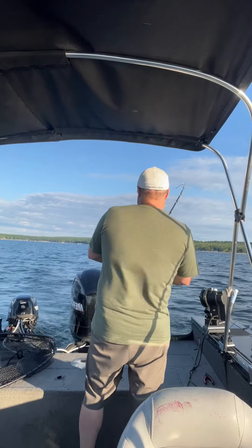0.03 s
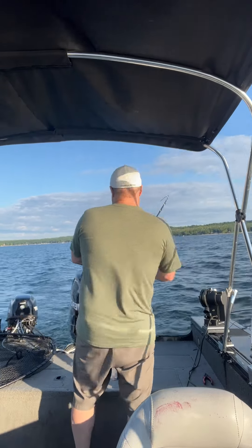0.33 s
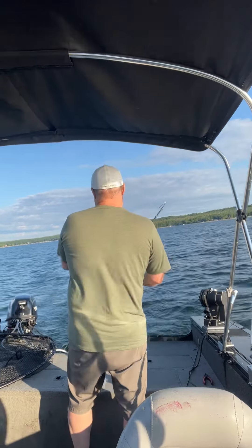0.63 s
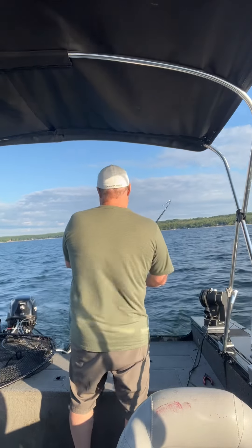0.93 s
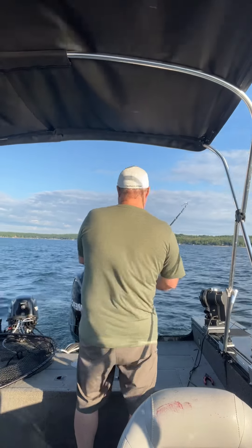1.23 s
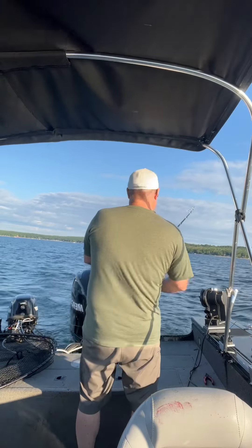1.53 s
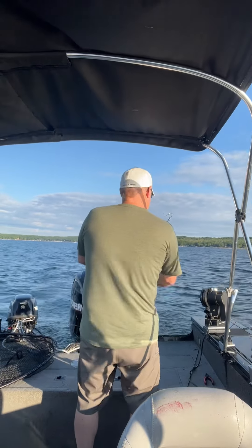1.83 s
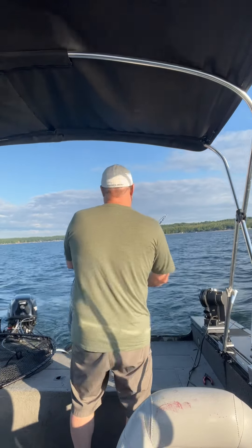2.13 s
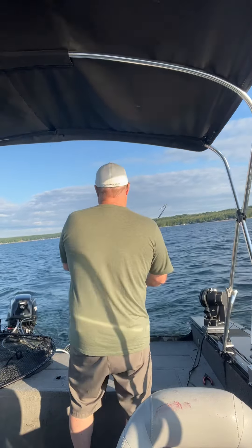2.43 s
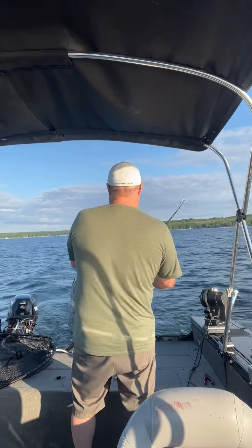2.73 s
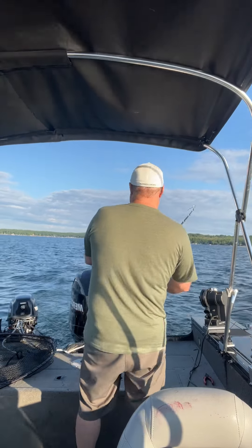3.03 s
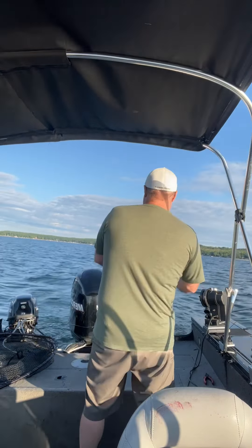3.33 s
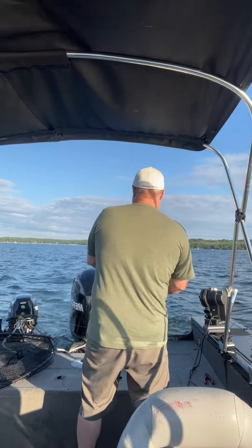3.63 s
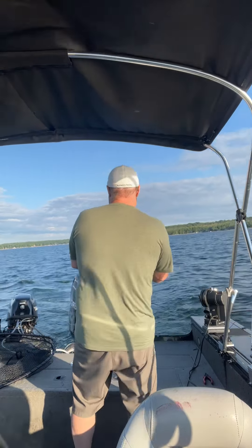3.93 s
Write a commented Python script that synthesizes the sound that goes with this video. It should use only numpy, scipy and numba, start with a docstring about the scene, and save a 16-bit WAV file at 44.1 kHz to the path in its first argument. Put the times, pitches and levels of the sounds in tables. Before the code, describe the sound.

A fishing reel whirrs and rattles in three short bursts on a small boat. An outboard engine throbs steadily and water washes along the hull, while gusts buffet the microphone midway and a few light knocks sound on deck.

```python
"""On the stern of a small boat, an outboard engine throbs at trolling speed and water washes along the hull.
Right away a geared drive, probably a fishing reel, whirrs for half a second: its teeth rattle a small
housing, and it flutters whenever it slows. From about 1.2 s, stronger gusts buffet the microphone.
The drive whirrs again at 1.5 s and at 3 s. Then the wind drops, the last of five light knocks
sounds on deck, and the engine throbs on."""
import sys
import numpy as np
from scipy import signal
from scipy.fft import rfft, irfft
from scipy.io import wavfile
from scipy.ndimage import uniform_filter1d
from numba import njit

SR = 44100
rng = np.random.default_rng(int(sys.argv[2]) if len(sys.argv) > 2 else 0)


def to_wav(s):
    """Save 16-bit WAV."""
    ch = np.atleast_2d(s).T  # columns
    pcm = np.round(np.clip(ch, -1, 1) * 32767)  # PCM
    wavfile.write(sys.argv[1], SR, pcm.astype(np.int16))


N = 176400  # 4 seconds

# The tone of water on the hull. Each row: frequency in Hz, relative level in dB.
WASH_TONE = [(180, -30), (300, 1), (337, 3), (431, -3), (453, -5), (535, -0.5), (590, -8.5), (821, -9.5),
             (907, -7.5), (1110, -4), (1350, -2), (1490, -6), (2100, -11.5), (15500, -27.5)]
# The engine's speed. Each row: time in seconds, firings per second.
ENGINE_SPEED = [(0, 39), (.5, 39), (.85, 38.6), (1.3, 39), (1.9, 39.3), (2.4, 39.05), (4, 39.15)]
# The exhaust's low tones. Each row: multiple of the firing rate, level in dB.
EXHAUST_TONES = [(1, -45), (1.5, -79), (2, -27.5), (3, -27), (4, -38), (4.5, -38), (5, -29.5), (6, -48.5),
                 (7, -49.5), (8, -52.5)]
# The whine of the engine's gears. Each row: multiple of the firing rate, level in dB.
ENGINE_GEAR_TONES = [(24, -47.5), (25, -56), (35, -58), (36, -48.5)]
# How the engine cover rings. Each row: pitch in Hz, width in Hz, relative level in dB.
COVER_RINGS = [(783, 130, -4.5), (940, 140, -10), (1027, 380, -1.5), (1130, 340, -10), (1346, 31, -2.5),
               (3150, 340, -6)]
# Wind on the microphone. Each row: time in seconds, relative rumble and buffeting levels in dB.
GUSTS = [(0, -8.5, -46), (.06, -18, -21), (.1, -17.5, -59), (.13, -16.5, -26), (.18, -31.5, -52),
         (.66, -30, -65), (.71, -14.5, -37), (.78, -26, -50), (.93, -21, -40), (1.13, -20, -38),
         (1.18, -13.5, -17), (1.32, -13.5, -19), (1.43, -14.5, -23), (1.5, -9, -21), (1.59, -14, -30),
         (1.64, -6.5, -19.5), (1.69, -14, -26), (1.82, -14.5, -37.5), (1.92, -14.5, -31),
         (1.97, -12.5, -37), (2.01, -28.5, -62), (2.09, -24, -33.5), (2.16, -13.5, -24), (2.33, -12, -21.5),
         (2.41, -10, -28), (2.49, -20.5, -40), (2.57, -10, -18.5), (2.63, -17.5, -29.5), (2.74, -17.5, -30),
         (2.82, -20.5, -44), (2.94, -16.5, -35), (2.98, -28.5, -44), (3.09, -18.5, -31.5),
         (3.13, -14, -24.5), (3.16, -19, -23.5), (3.21, -26, -53), (3.36, -27, -33.5), (3.45, -30, -59),
         (4, -32.5, -55)]
# The tones of the wind's rumble and buffeting. Each row: frequency in Hz, relative level in dB.
RUMBLE_TONE = [(15, -20), (30, -10), (52, 7.5), (85, 4), (150, -0.5), (220, -14.5), (400, -58),
               (3000, -110)]
BUFFET_TONE = [(80, -85), (160, -3), (240, -2), (350, -9.5), (500, -15.5), (750, -26.5), (1300, -35.5),
               (3000, -64), (10000, -90)]
# The wind's hardest buffets. Each row: start in seconds, boost over the gust in dB.
WIND_THUMPS = [(1.174, 6), (1.262, 3), (1.285, 10), (1.316, 10), (1.49, 8), (1.629, 11.5), (2.329, 10.5),
               (2.395, 11), (2.425, 12.5), (2.557, 0.5), (3.146, 6)]
# Light knocks on deck. Each row: start in seconds, level in dB, pitch in Hz.
DECK_KNOCKS = [(.305, -30, 1130), (1.043, -42.5, 6000), (1.088, -53, 5000), (2.07, -32, 1670),
               (3.742, -38.5, 1600)]
# How hard the drive works, one list per burst. Each row: time in seconds, effort in dB.
DRIVE_BURSTS = [
    [(0, -28.5), (.16, -29.5), (.27, -26), (.33, -28.5), (.385, -33.5), (.455, -28), (.51, -33)],
    [(1.475, -33), (1.5, -35), (1.56, -29.5), (1.65, -29.5), (1.71, -26.5), (1.8, -29.5), (1.875, -34.5),
     (1.965, -28.5), (2.033, -35.5)],
    [(3.024, -32.5), (3.09, -28.5), (3.17, -28.5), (3.255, -26), (3.37, -30.5), (3.49, -28), (3.541, -32)],
]
# The housing's tone, low part and high part. Each row: frequency in Hz, relative level in dB.
HOUSING_LOW_TONE = [(300, -7), (1000, -2), (1750, -54)]
HOUSING_HIGH_TONE = [(1650, -39), (2800, -4.5), (3980, -4), (4330, -1.5), (4930, -1.5), (5330, -1.5),
                     (6520, -1.5), (9120, -4.5), (10800, -8.5), (12500, -10), (14500, -2.5), (15500, -11.5)]
# How the housing rings. Each row: resting pitch in Hz, width in Hz, relative level in dB.
HOUSING_RINGS = [(2120, 55, 3), (2255, 70, 4), (2430, 80, 1), (4460, 90, -2), (4860, 100, -4),
                 (5450, 60, 5), (5680, 100, -2), (6130, 90, 1)]
# The rings slide together. Each row: time in seconds, rough pitch of the strongest one in Hz.
RING_SLIDE = [(0, 5390), (.16, 5510), (.27, 5430), (.5, 5420), (1.5, 5300), (1.75, 5446), (2.03, 5460),
              (3.03, 5380), (3.12, 5200), (3.28, 5360), (3.42, 5350), (3.54, 5190)]
# Echoes of the drive off nearby fittings. Each row: delay in seconds, gain.
FITTING_ECHOES = [(.0019, 0.24), (.0037, 0.24), (.0066, 0.34)]


def undb(db):
    """Turn decibels into a gain."""
    return 10 ** (np.asarray(db) / 20)


def unit(x):
    """Scale a sound to an average (rms) level of 1."""
    return x / np.sqrt(np.mean(x ** 2) + 1e-18)


def noise():
    """A plain hiss (white noise)."""
    return rng.standard_normal(N)


def curve(rows, column=1):
    """Join one column of a table with straight lines over time."""
    rows = np.array(rows)
    return np.interp(np.arange(N) / SR, rows[:, 0], rows[:, column])


def colour(x, tone):
    """Shape a sound's lows and highs with rows of (Hz, dB)."""
    hz, db = np.array(tone).T
    freqs = np.fft.rfftfreq(N, 1 / SR)
    return irfft(rfft(x) * undb(np.interp(np.log(freqs + 1), np.log(hz), db)), N)


def ring(x, rings):
    """Make a sound ring at each row of (pitch in Hz, width in Hz, dB)."""
    return sum(undb(db) * signal.lfilter(*signal.iirpeak(hz, hz / width, SR), x)
               for hz, width, db in rings)


@njit
def sliding_ring(x, hz, width):
    """Make a sound ring at one moving pitch."""
    y, band_state, low_state = np.empty(len(x)), 0., 0.
    for i in range(len(x)):
        tuning, damping = np.tan(np.pi * hz[i] / SR), width / hz[i]
        band = (band_state + tuning * (x[i] - low_state)) / (1 + tuning * (tuning + damping))
        band_state = 2 * band - band_state
        low_state += 2 * tuning * band
        y[i] = damping * band
    return y


def wander(per_second):
    """A smooth random wobble, about 1 in size."""
    step = int(SR / per_second)
    return unit(uniform_filter1d(np.repeat(rng.standard_normal(N // step + 1), step), step)[:N])


def steady(x, seconds):
    """Hold the level near 1 by evening out slow swings."""
    return x / np.sqrt(np.abs(uniform_filter1d(x ** 2, int(seconds * SR))) + 1e-12)


def clicks(turns, spread_db, variation, count):
    """Uneven clicks that repeat every turn, their sizes varying each time."""
    places = rng.random(count)
    pattern = undb(spread_db * rng.standard_normal(count)) * rng.choice([-1, 1], count)
    marks = np.arange(np.ceil(turns[0]) - 1, turns[-1])[:, None] + places
    sizes = pattern * (1 + variation * rng.standard_normal(marks.shape))
    inside = (marks > turns[0]) & (marks < turns[-1])
    at = np.interp(marks[inside], turns, np.arange(N))
    nearby = np.floor(at)[:, None] + np.arange(-3, 5)  # lets a click fall between samples
    pulses = sizes[inside][:, None] * np.sinc(nearby - at[:, None])
    return np.bincount(nearby.astype(int).ravel() % N, pulses.ravel(), N)


def water():
    """Water washes along the hull with a flickering hiss and fine drops of spray."""
    wash = unit(colour(noise(), WASH_TONE)) * undb(0.8 * wander(40) + 0.5 * wander(4.5))
    drop_starts = rng.random(N) < 400 / SR  # about 400 a second
    drops = drop_starts * undb(9.1 * rng.random(N)) * rng.choice([-1, 1], N)
    spray = unit(ring(drops, [(2960, 750, 0), (6550, 140, 2), (8500, 940, -0.5)]))
    return undb(-41) * wash + undb(-54.5) * spray


def outboard():
    """The exhaust throbs, a drone swells, gears whine and valves clatter under the cover."""
    drone_hz, drone_width_hz = 517.7, 68
    firings = np.cumsum(curve(ENGINE_SPEED) * (1 + 0.001995 * wander(12))) / SR
    firings -= np.interp(3.568, np.arange(N) / SR, firings)  # one firing lands at 3.568 s
    angle = 2 * np.pi * firings
    exhaust = -sum(undb(db + 0.5 * wander(7)) * np.sqrt(2) * np.sin(multiple * angle)
                   for multiple, db in EXHAUST_TONES)
    swell = unit(1 + 0.73 * np.cos(angle / 2 - 1.2))  # peaks on every second firing
    drone = undb(-44) * np.sqrt(2) * np.sin(14 * angle + 0.55 * wander(14))
    rasp = ring(clicks(firings / 2, 0.68, 0.53, count=60), [(drone_hz, drone_width_hz, 0)])
    rasp = undb(-42) * unit(ring(rasp, [(drone_hz, 2 * drone_width_hz, 0)]))
    valves = clicks(firings / 2, spread_db=1.5, variation=0.37, count=24)
    clatter = undb(-42) * unit(ring(ring(valves, COVER_RINGS), [(1050, 1550, 0)]))
    whine = sum(undb(db + 1.4 * wander(10)) * np.sqrt(2) * np.sin(multiple * angle + 0.75 * wander(12))
                for multiple, db in ENGINE_GEAR_TONES)
    return exhaust + whine + swell * (drone + rasp) + clatter


def wind():
    """Wind rumbles on the microphone, and ragged swirls of air buffet and thump it."""
    t = np.arange(N) / SR
    swirl_limit, thump_s = 3.0, 0.018
    rumble = steady(colour(noise(), RUMBLE_TONE), 0.0345) * undb(curve(GUSTS, column=1) + 1.5)
    swirls = steady(colour(noise(), BUFFET_TONE), 0.0145)
    swirls = steady(swirls * undb(4 * wander(48)), 0.07)
    swirls = swirl_limit * np.tanh(swirls / swirl_limit)  # rounds off the biggest swirls
    thump_db = sum(db * (t >= at) * np.exp(-((t - at) / thump_s) ** 2) for at, db in WIND_THUMPS)
    buffet_db = curve(GUSTS, column=2) + 2.5 + uniform_filter1d(thump_db, size=130)
    return rumble + swirls * undb(buffet_db)


def knocks():
    """Gear knocks on deck: short, dry puffs of noise that die away fast."""
    t = np.arange(N) / SR
    sound, fade_s = np.zeros(N), 0.015
    for at, db, hz in DECK_KNOCKS:
        fade = (t >= at) * np.exp(-np.abs(t - at) / fade_s)
        sound += undb(db) * unit(ring(noise(), [(hz, hz * 0.28, 0)])) * fade
    return sound


def add_echoes(x):
    """Sound bounces off nearby fittings; the delays sway as the drive is moved."""
    n, sway_s = np.arange(N), 0.00012
    return x + sum(gain * np.interp(n - SR * (delay + sway_s * wander(5)), n, x)
                   for delay, gain in FITTING_ECHOES)


def housing(rattle, surge_db):
    """The drive's shaken housing rings; more effort makes its whine higher and louder."""
    rest_hz = 5450
    shift = curve(RING_SLIDE) / rest_hz * (1 + 0.0035 * surge_db)
    whine = np.zeros(N)
    for hz, width, db in HOUSING_RINGS:
        gain = undb(db + 1.5 * wander(8.95))
        pitch = hz * shift * (1 + 0.005 * wander(13))
        whine += gain * steady(sliding_ring(rattle, pitch, float(width)), 0.021)
    whirr = unit(colour(rattle, HOUSING_LOW_TONE + HOUSING_HIGH_TONE))
    return whirr + undb(-1 + 0.35 * surge_db) * unit(whine)


def drive():
    """Gear teeth click and rub in the housing; at low speed each turn is heard as a flutter."""
    t = np.arange(N) / SR
    usual_effort_db, usual_turn_hz, db_per_doubling = -28, 175, 3.0
    flutter_db, flutter_below_hz, stop_s = 6, 52, 0.008
    effort_db = curve([row for burst in DRIVE_BURSTS for row in burst])
    surge_db = effort_db - usual_effort_db
    running = sum((t >= burst[0][0]) * np.exp(-np.maximum(t - burst[-1][0], 0) / stop_s)
                  for burst in DRIVE_BURSTS)
    turn_hz = usual_turn_hz * 2 ** (surge_db / db_per_doubling)
    turns = np.cumsum(turn_hz) / SR
    depth_db = flutter_db / (1 + (turn_hz / flutter_below_hz) ** 2)
    flutter = steady(undb(depth_db * np.cos(2 * np.pi * turns)), 0.035)
    teeth = steady(clicks(turns, spread_db=2.5, variation=0.35, count=36), 0.038)
    rubbing = undb(-2) * noise()
    whirr = steady(add_echoes(housing(teeth + rubbing, surge_db)), 0.099)
    return whirr * flutter * running * undb(effort_db + 1)


def scene():
    """Everything together in the open air, in one channel."""
    return (drive() + outboard() + water() + wind() + knocks())[None]


def record(dry):
    """The microphone rounds off the strongest gusts and cuts the highest treble."""
    top_hz = 15750
    rounded = dry / (1 + dry ** 6) ** (1 / 6)
    return signal.sosfilt(signal.ellip(10, 0.2, 80, top_hz, fs=SR, output="sos"), rounded)


dry = scene()
out = record(dry)
to_wav(out)
```